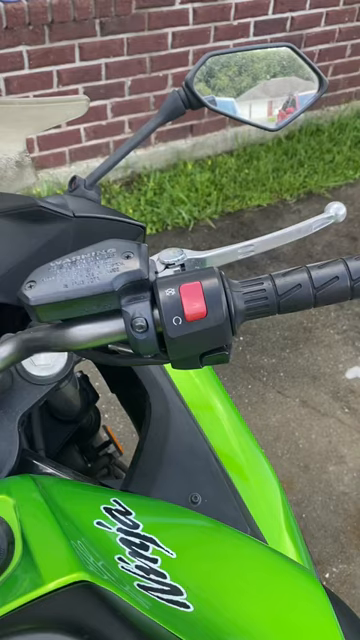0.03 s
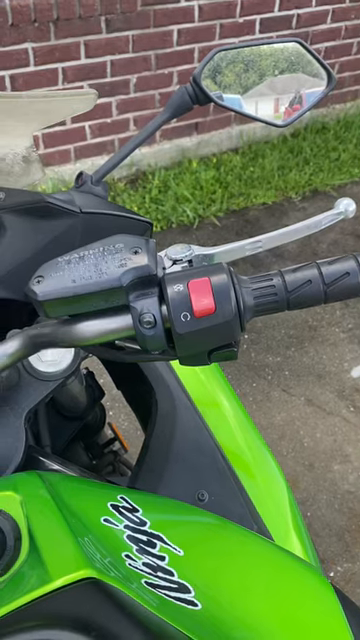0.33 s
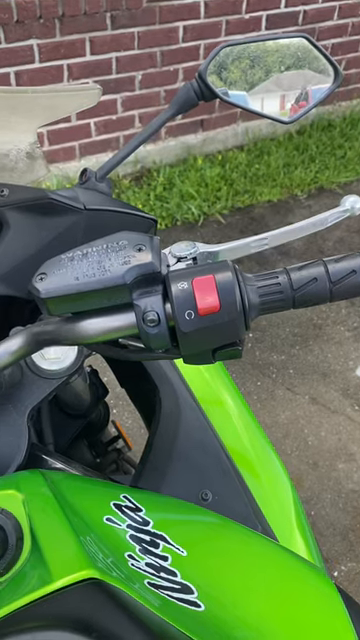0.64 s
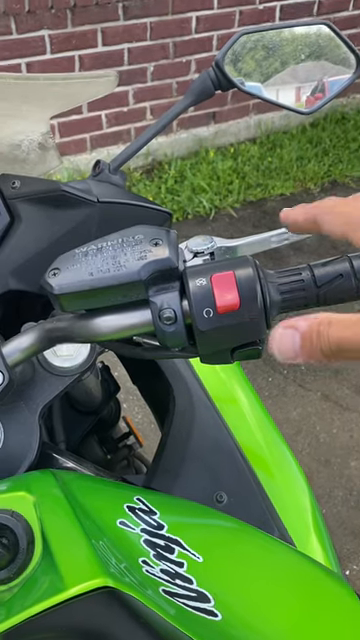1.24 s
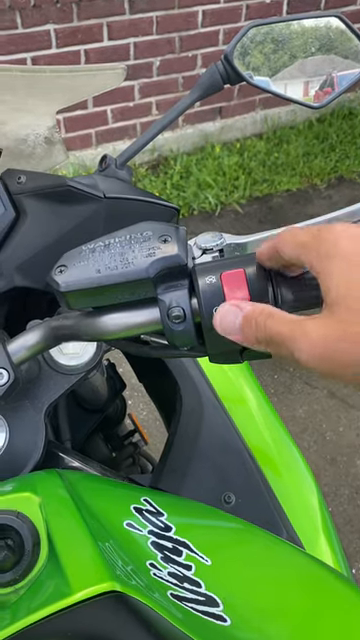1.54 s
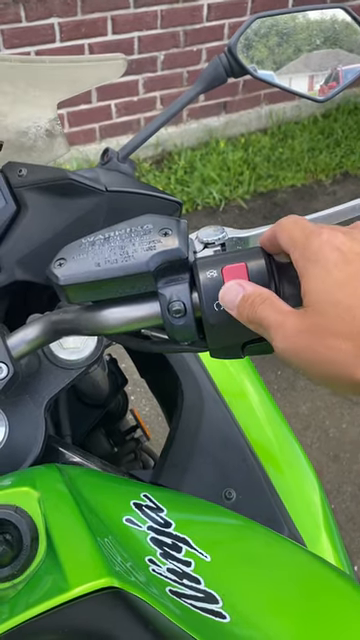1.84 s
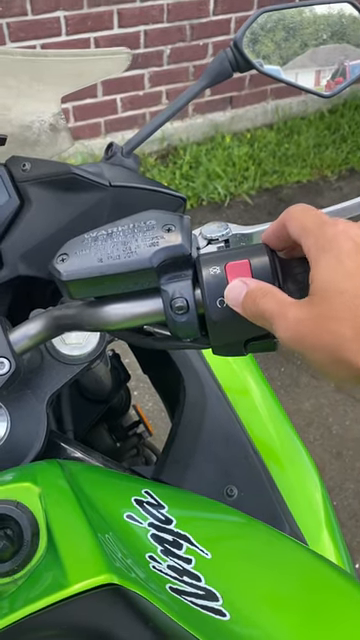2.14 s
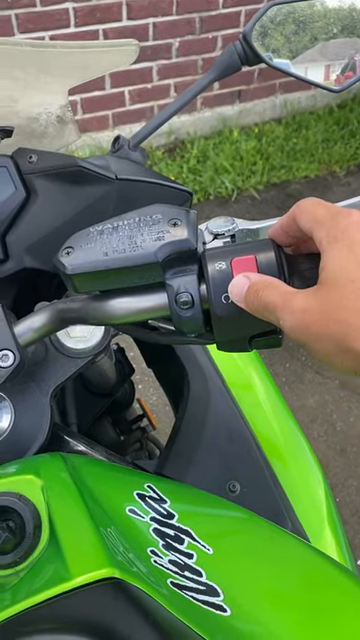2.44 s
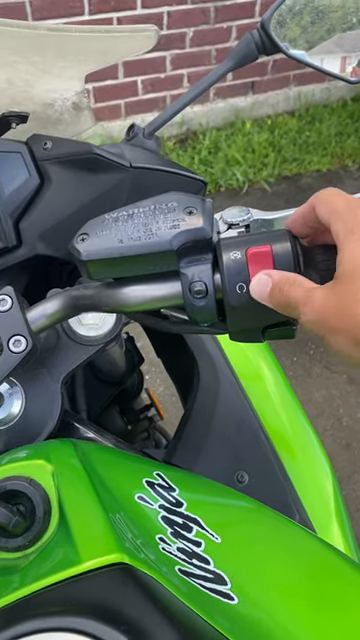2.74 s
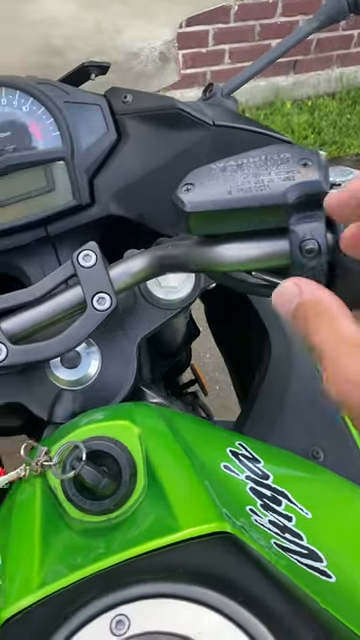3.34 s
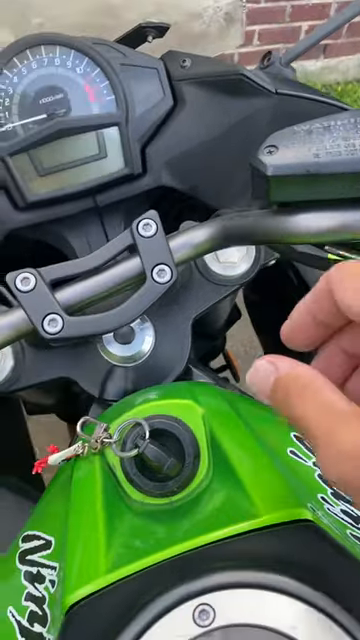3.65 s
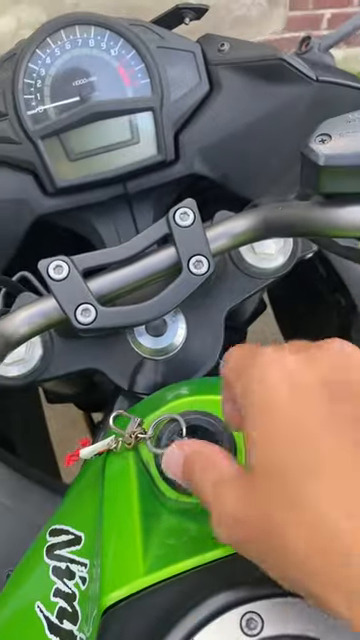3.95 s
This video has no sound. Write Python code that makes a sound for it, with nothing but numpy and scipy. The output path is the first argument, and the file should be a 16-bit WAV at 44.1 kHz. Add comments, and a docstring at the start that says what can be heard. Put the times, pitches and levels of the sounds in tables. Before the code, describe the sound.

A plastic motorcycle switch snaps once, sharp and close, at about 2.5 seconds. Outdoors, distant traffic rumbles and hums throughout, with two soft low bumps in the first second. A high insect buzz runs until 1.3 seconds, stutters, then resumes more quietly from 2 seconds as far insects swell. A small bird gives faint, thin rising chips at the start and again after 2 seconds.

```python
"""A motorcycle switch snaps outdoors

A thumb snaps the plastic rocker switch on a parked motorcycle's handlebar, close by: its parts
hit each other and make the housing ring. A katydid scrapes its wings in a buzz that stutters and
resumes, and a small bird gives thin rising chips. Far insects swell, two soft bumps sound,
and distant traffic rumbles under an engine hum."""
import sys
import numpy as np
from scipy import signal
from scipy.fft import rfft, irfft, next_fast_len
from scipy.io import wavfile
from scipy.ndimage import map_coordinates

SR = 44100
rng = np.random.default_rng(int(sys.argv[2]) if len(sys.argv) > 2 else 0)


def wrap_up_sound(samples):
    """Save the sound to the file named by the first command line argument, as 16-bit audio."""
    columns = np.atleast_2d(samples).T
    # keep every value between -1 and 1, then stretch to whole-number steps
    tamed = np.clip(columns, -1, 1)
    steps = np.round(tamed * 32767).astype(np.int16)
    wavfile.write(sys.argv[1], SR, steps)


N = 176400

# The tone of the outdoor air. Each row: frequency in Hz, level in dB.
AIR_TONE = [(150, -13.5), (250, -0.5), (275, -7.5), (298, -9.5), (408, -9.5), (1020, -11), (1830, -35),
            (2750, -36), (4150, -42.5), (6500, -47.5), (8450, -63.5), (12500, -120)]
# Each row: frequency in Hz, how alike left and right are (1 is the same, -1 is opposite).
AIR_LIKENESS = [(200, 0.96), (350, 0.46), (600, -0.00096), (1000, -0.65), (1700, 0.71), (4000, -0.41),
                (8000, 0.88)]


def air():
    """The wide, even wash of the neighbourhood."""
    def shares(hz):
        angle = np.arccos(np.clip(along(AIR_LIKENESS, hz), -1, 1)) / 2
        return np.array([np.cos(angle), np.sin(angle)])

    shared, opposite = filtered(np.array([noise(AIR_TONE), noise(AIR_TONE)]), shares)
    level_db = -47 + 1.2 * wobble(2.89)
    return amp(level_db) * unit(np.array([shared + opposite, shared - opposite]))


# The tone of the road rumble. Each row: frequency in Hz, level in dB.
RUMBLE_TONE = [(15, -63), (25, -32.5), (38, -14.5), (50, 4), (70, 2.5), (100, 0.5), (130, -5), (160, -9),
               (200, -19), (280, -19), (400, -34), (600, -79)]
# How loud the rumble is. Each row: time in seconds, level in dB.
RUMBLE_LEVEL = [(0, -36.5), (1.0, -35.5), (1.8, -35), (2.3, -34.5), (3.05, -39.5), (3.45, -38),
                (3.75, -37.5), (4.0, -38.5)]
# The engine hum. Each row: time in seconds, pitch in Hz, level in dB.
ENGINE_HUM = [(0, 128, -41), (.8, 127.5, -36.5), (1.3, 126, -39), (1.8, 128, -36.5), (2.08, 127, -42),
              (2.7, 123, -42), (3.0, 124, -51), (4, 121, -45.5)]


def traffic():
    """Distant traffic: the road rumbles and engines hum unsteadily."""
    rumble_db, = curves(RUMBLE_LEVEL)
    hum_hz, hum_db = curves(ENGINE_HUM)
    phase = turns(hum_hz + 1.01 * wobble(11))
    hum = amp(hum_db + 2.2 * wobble(9)) * (np.sin(phase) + amp(-23.5) * np.sin(2 * phase))
    drone_db, drone_hz = -42 + 5 * wobble(3.385), 88.7 + 1.68 * wobble(4.4)
    drone = amp(drone_db) * np.sin(turns(drone_hz))
    # A second, quieter noise makes left and right differ.
    rumble = noise(RUMBLE_TONE) + amp(-19) * noise(RUMBLE_TONE) * np.array([[1], [-1]])
    return amp(rumble_db + 1.66 * wobble(12)) * rumble + np.sqrt(2) * (hum + drone)


# Low bumps. Each row: time of the middle in seconds, level in dB, pitch in Hz.
LOW_BUMPS = [(.14, -24.5, 66), (.908, -21.5, 95)]


def bumps(half_width_s=.018):
    """Soft low bumps, each a tone that swells and fades within a few cycles."""
    t = np.arange(N) / SR
    return sum(amp(db) * np.exp(-((t - s) / half_width_s) ** 2) * np.sin(2 * np.pi * hz * (t - s))
               for s, db, hz in LOW_BUMPS)


def amp(db):
    """Turn decibels into a number to multiply by."""
    return 10 ** (np.asarray(db) / 20)


def unit(x):
    """Scale a sound to an average (rms) level of 1."""
    return x / np.sqrt(np.mean(x ** 2) + 1e-20)


def along(points, hz):
    """Read between the rows of a (frequency, value) table, on a log frequency scale."""
    f, v = np.transpose(points)
    return np.interp(np.log(hz + 1), np.log(f + 1), v)


def curves(rows):
    """One value per sample for each column after the time."""
    s, *cols = np.transpose(rows)
    return [np.interp(np.arange(N) / SR, s, c) for c in cols]


def wobble(rate):
    """A smooth random curve through rate points a second."""
    return map_coordinates(rng.standard_normal(N // 8), [np.arange(N) * rate / SR], mode="wrap")


def turns(hz):
    """The phase, in radians, of a moving pitch."""
    return 2 * np.pi * np.cumsum(hz) / SR


def add(track, s, sound):
    """Mix a sound in at s seconds."""
    part = track[max(round(s * SR), 0):][:len(sound)]
    part += sound[:len(part)]


def filtered(x, response):
    """Multiply each frequency in a sound by response(hz)."""
    m = next_fast_len(N + SR // 2)
    return irfft(rfft(x, m) * response(np.fft.rfftfreq(m, 1 / SR)), m)[..., :N]


def noise(spectrum):
    """Noise with the given tone, at an average level of 1."""
    return unit(filtered(rng.standard_normal(N), lambda hz: amp(along(spectrum, hz))))


def echoes(x, decay):
    """A blur of echoes in which each frequency dies at its own speed."""
    hz, t, z = signal.stft(rng.standard_normal(SR), SR, nperseg=256)
    fading = np.exp(-np.log(1000) * t / along(decay, hz)[:, None])
    tail = signal.istft(z * fading, SR, nperseg=256)[1]
    return signal.fftconvolve(x, tail / np.linalg.norm(tail))[:N]


# Each row: frequency in Hz, how far the left side leads in radians.
LEFT_LEAD = [(100, 1.5), (2000, 1.03), (2800, 1.916), (5500, 1.26), (8000, 1.68), (10200, 1.977),
             (15000, 4.6)]


def ports(x):
    """A sound from ahead reaches the two microphone openings out of step."""
    return filtered(x, lambda hz: np.exp(.5j * along(LEFT_LEAD, hz) * np.array([[1], [-1]])))


# The far insects' swell. Each row: time in seconds, level in dB, centre pitch in Hz.
CHORUS_SWELL = [(.05, -70.5, 2600), (.75, -67, 2580), (1.3, -65.5, 2696), (2.0, -60.5, 2729),
                (2.8, -59, 2787), (3.3, -60, 2807), (4.0, -63, 2870)]
# Their bands of sound. Each row: multiple of the centre pitch, half width in Hz, level in dB.
CHORUS_BANDS = [(.85, 136, -9.5), (1, 108, -1), (1.17, 204, -9.5)]
# The farthest insects blur into a wash. Each row: frequency in Hz, level in dB.
WASH_TONE = [(1500, -37), (2200, -3.5), (2700, -4.5), (3300, -2.5), (3700, -7), (4200, -18), (5500, -44.5)]
# How the wash grows. Each row: time in seconds, level in dB.
WASH_LEVEL = [(0, -77), (2.0, -70.5), (3.2, -66), (3.6, -65), (4.0, -63)]


def insect_chorus(waver_hz=44.84):
    """Many far insects merge into narrow bands that swell and rise together over a broader wash."""
    swell_db, centre_hz = curves(CHORUS_SWELL)
    bands = np.zeros(N)
    for ratio, width_hz, band_db in CHORUS_BANDS:
        # Slow noise times a tone makes a narrow band of noise around that tone.
        slow = filtered(rng.standard_normal((2, N)), lambda hz: 1 / (1 + (hz / width_hz) ** 2))
        phase = turns(ratio * centre_hz + waver_hz * wobble(9.8))
        band = unit(slow[0] * np.cos(phase) + slow[1] * np.sin(phase))
        bands += amp(band_db + wobble(13)) * band
    wash_db, = curves(WASH_LEVEL)
    return ports(amp(swell_db) * bands + amp(wash_db) * noise(WASH_TONE))


# The bird's chips. Each row: start and length in seconds, first and last pitch in Hz, level in dB.
BIRD_CHIPS = [(0.059, 0.047, 7220, 8250, -54.5), (.148, 0.032, 7670, 8300, -52),
              (0.291, 0.092, 6730, 7970, -57.5), (2.174, 0.059, 6850, 7400, -72.5),
              (2.259, 0.041, 7400, 8060, -63), (2.371, 0.074, 6400, 8430, -61.5),
              (2.617, 0.05, 6610, 7450, -71), (2.708, 0.025, 7580, 8080, -59),
              (3.063, 0.066, 7150, 7390, -79), (3.16, 0.031, 7400, 7950, -64.5),
              (3.604, 0.069, 7100, 7310, -81), (3.684, 0.037, 7460, 7950, -70),
              (3.819, 0.034, 7240, 7960, -62.5), (3.946, 0.043, 7510, 7920, -62)]
# Its voice drops off steeply at the top. Each row: frequency in Hz, boost or cut in dB.
BIRD_TONE = [(6000, 9), (8250, -1.5), (8700, -35)]
# The echo from the trees. Each row: frequency in Hz, seconds to fade by 60 dB.
TREE_ECHO = [(5000, .7), (9000, 0.39)]


def bird(rasp_hz=860, rasp_depth=.3):
    """A small bird's thin, raspy chips rise and level off, smeared by echoes from the trees."""
    chips, waver_hz = np.zeros(N), 70 * wobble(300)
    for s, length, start_hz, end_hz, db in BIRD_CHIPS:
        progress = np.linspace(0, 1, round(length * SR))
        pitch = end_hz + (start_hz - end_hz) * (1 - progress) ** 2
        pitch += np.roll(waver_hz, -round(s * SR))[:len(progress)]
        add(chips, s, amp(db) * np.abs(np.sin(np.pi * progress)) * np.sin(turns(pitch)))
    rasp = 1 + rasp_depth * np.sin(turns(rasp_hz + 110 * wobble(27)))
    voice = filtered(chips * rasp, lambda hz: amp(along(BIRD_TONE, hz)))
    return ports(voice + amp(4.5) * echoes(voice, TREE_ECHO))


# The katydid's two long buzzes. Each row: time in seconds, level in dB, top pitch in Hz,
# half width of a wing stroke's loud middle as a share of the stroke, strokes per second.
FIRST_BUZZ = [(.0375, -48, 10520, 0.39, 76), (.5, -45.5, 10500, 0.34, 72.5),
              (.62, -47.5, 10530, 0.41, 72.5), (1.205, -46, 10490, 0.36, 74.3)]
SECOND_BUZZ = [(2.029, -59.5, 10080, 0.29, 70.4), (2.3, -54.5, 10050, 0.22, 71.86),
               (2.5, -56.5, 10120, 0.35, 68.1), (2.75, -55, 10260, 0.31, 73.24),
               (3.15, -51, 10200, 0.25, 72), (3.43, -55.5, 10270, 0.3, 72.5),
               (3.682, -47, 10270, 0.22, 72.65), (4.0, -50, 10300, 0.32, 73.3)]
# Lone strokes between the buzzes. Each row: start in seconds, level in dB, top pitch in Hz,
# half width of the loud middle as a share of the stroke.
LONE_STROKES = [(1.252, -44.5, 10450, 0.35), (1.271, -44.5, 10500, 0.29), (1.615, -49.5, 10300, 0.3),
                (1.777, -55, 10200, 0.26), (1.860, -60, 10100, 0.23), (1.961, -59, 10050, .17)]
# The hiss of far katydids. Each row: frequency in Hz, level in dB.
FAR_KATYDIDS = [(8700, -26.5), (9500, -12), (10200, -8), (10600, -6), (11100, -4.5), (11500, -34),
                (12000, -45), (13000, -86)]


def katydid(stroke_s=.012, return_s=.0068):
    """Each wing stroke arches in pitch as the scraper speeds up and slows; others sing far off."""
    strokes, buzz = list(LONE_STROKES), np.zeros(N)
    for run in (FIRST_BUZZ, SECOND_BUZZ):
        times, *columns, rate = np.transpose(run)
        at = times[0]
        while at < times[-1]:
            strokes.append((at, *(np.interp(at, times, column) for column in columns)))
            at += 1 / np.interp(at, times, rate)
    progress = np.linspace(0, 1, round(stroke_s * SR))
    arch_hz = -4410 * (progress - .53) ** 2  # highest just past the middle
    tooth_rasp = 1 + .14 * wobble(1200)
    far = amp(-69) * noise(FAR_KATYDIDS)
    for s, db, top_hz, width in strokes:
        late, louder, higher = rng.standard_normal(3)  # no two strokes are quite alike
        grip = np.abs(np.sin(np.pi * progress)) ** .5 / (1 + np.abs((progress - .5) / width) ** 8)
        pitch = top_hz + 25 * higher + arch_hz
        stroke = amp(db + .52 * louder) * np.sqrt(2) * grip * np.sin(turns(pitch))
        add(buzz, s + .00015 * late, stroke)
        add(buzz, s + return_s, amp(-16) * stroke)  # the wing's faint return
    return ports(buzz * tooth_rasp + far)


# The hits within one snap: release, slide, hard stop and two bounces.
# Each row: start in seconds, level in dB.
SWITCH_HITS = [(2.48312, -38.8), (2.48571, -18.8), (2.48698, -10.2), (2.48744, -18.5), (2.48882, -27.5)]
# The notes the switch and housing ring at. Each row: pitch in Hz, level in dB, seconds to fade by 60 dB.
HOUSING_NOTES = [(856, -18.5, .042), (1090, -23, .031), (1640, -21.5, .013), (2387, -13, .025),
                 (2528, -2.6, .0052), (2839, -1.3, .014), (3757, -16, .0185), (4260, -15, .021),
                 (4550, -24, .024), (5430, .4, .0088), (5740, -1.2, .0084), (6117, -12.5, .02),
                 (6628, -14, .017), (7244, -9.7, .0135), (8010, -11.6, .0063), (9050, -6, .0136),
                 (9580, 1.5, .0086), (10534, -7.3, .01), (11782, -10, .01), (14076, -13, .009),
                 (15410, -19, .008)]
# The tone of each hit's crack. Each row: frequency in Hz, level in dB.
CRACK_TONE = [(400, -40), (750, -23), (1300, -11), (2200, -20), (4500, -18), (8200, -6.5), (9500, -3.5),
              (11700, 10), (12800, 1.5), (14100, -19), (15400, -22), (16000, -41)]
# The yard's echo. Each row: frequency in Hz, seconds to fade by 60 dB.
YARD_ECHO = [(500, .3), (3000, 0.28), (7000, 0.31), (14000, .087)]
# What the switch sends all round the yard. Each row: frequency in Hz, boost or cut in dB.
YARD_TONE = [(500, -2), (2500, 11), (4500, 6), (6000, 1), (8000, -9.5), (10500, -6), (11500, -30),
             (13000, -58)]


def rocker_switch(crack_fade_s=.007, ground_delay_s=.012, wall_delay_s=.15):
    """Quick hits crack and ring the plastic housing; the ground, a far wall and the yard echo it."""
    t = np.arange(SR // 8) / SR
    rings, cracks, ground = np.zeros((3, N))

    def fade(seconds):  # falls by 60 dB in this time
        return np.exp(-np.log(1000) * t / seconds)

    ring = sum((-1) ** k * amp(db) * fade(fade_s) * np.sin(2 * np.pi * hz * t)
               for k, (hz, db, fade_s) in enumerate(HOUSING_NOTES))
    for s, db in SWITCH_HITS:
        add(rings, s, amp(db) * ring)
        add(cracks, s, amp(db - 3) * fade(crack_fade_s) * noise(CRACK_TONE)[:len(t)])
    snap = rings + cracks
    scatter = rng.standard_normal(len(t)) * fade(.0284)  # rough ground spreads the echo
    add(ground, ground_delay_s, signal.fftconvolve(snap, scatter / np.linalg.norm(scatter)))
    ground = filtered(ground, lambda hz: 1 / (1 + (hz / 9650) ** 20))  # loses its highest treble
    wall = amp(-28) * np.roll(ground, round((wall_delay_s - ground_delay_s) * SR))
    yard = np.array([echoes(cracks, YARD_ECHO), echoes(cracks, YARD_ECHO)])
    yard = filtered(yard, lambda hz: amp(along(YARD_TONE, hz)))
    return ports(snap + amp(-21) * (ground + wall)) + amp(-10.5) * yard


def scene():
    """The switch in front of the outdoor sounds; traffic and air lean a little to the left."""
    centred = rocker_switch() + katydid() + bird() + insect_chorus() + bumps()
    return centred + traffic() * amp([[.4], [-.4]]) + air() * amp([[1.2], [-1.2]])


def record(dry, start_s=.036, top_hz=15900):
    """The sound comes in after a moment of silence, with its very highest treble cut away."""
    fade_in = np.clip((np.arange(N) / SR - start_s) * 500, 0, 1)
    return filtered(dry * fade_in, lambda hz: 1 / (1 + (hz / top_hz) ** 120))


dry = scene()
out = record(dry)
wrap_up_sound(out)
```